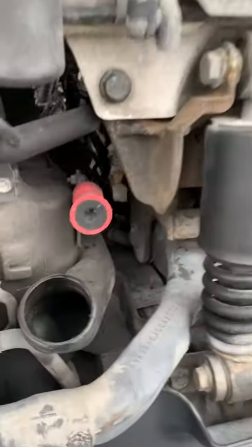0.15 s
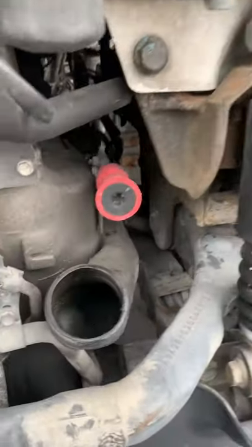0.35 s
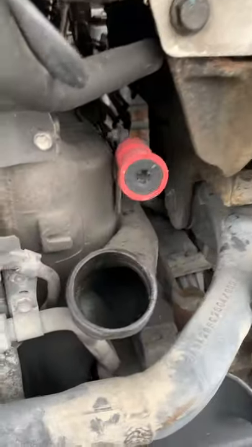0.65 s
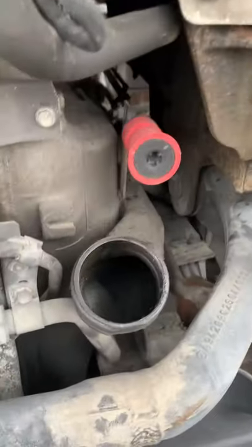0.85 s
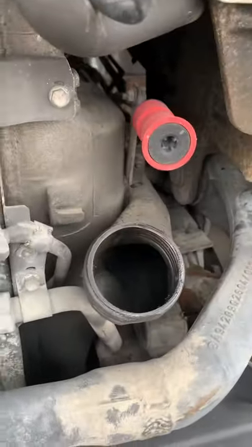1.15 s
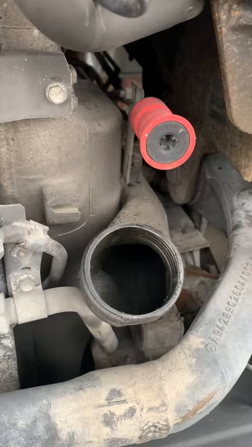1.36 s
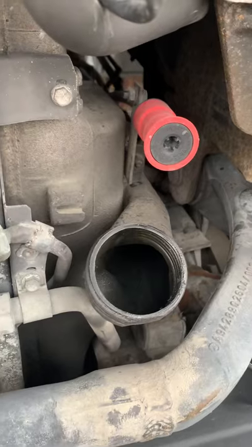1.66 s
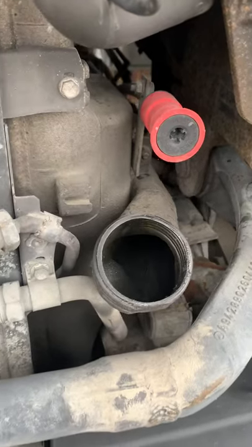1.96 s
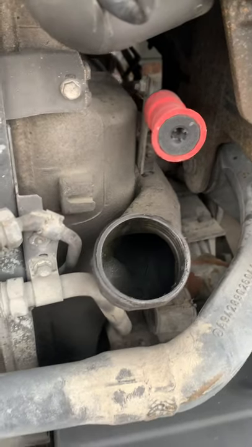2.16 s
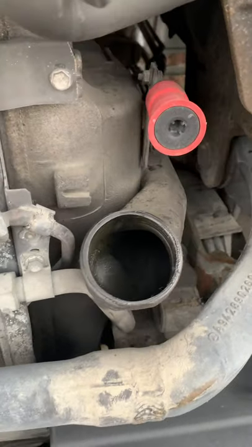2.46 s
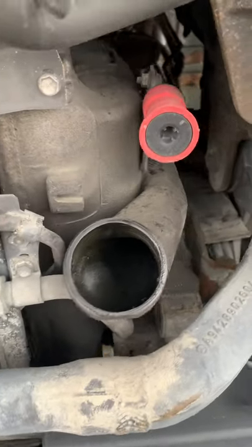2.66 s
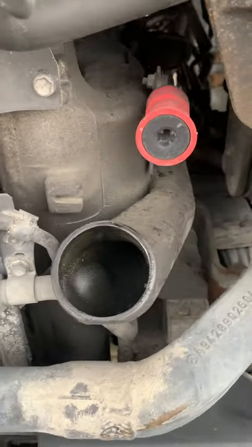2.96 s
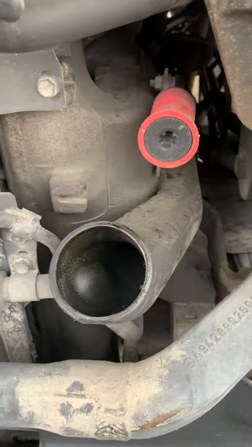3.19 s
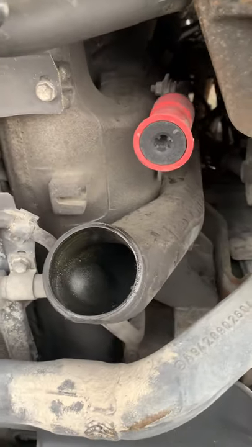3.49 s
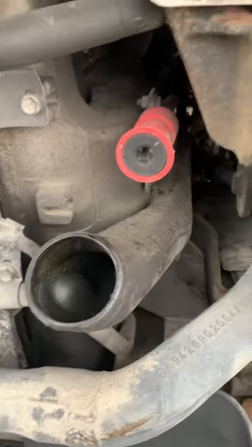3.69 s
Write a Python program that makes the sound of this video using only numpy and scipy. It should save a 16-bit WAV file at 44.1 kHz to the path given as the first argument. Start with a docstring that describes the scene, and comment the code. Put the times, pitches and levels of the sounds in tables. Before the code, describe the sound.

Truck diesel engine idling up close, rapid clattering knocks over a deep steady drone

```python
"""Beside the block of a six-cylinder truck diesel, close up, at idle.
Each firing thuds, clatters, ticks (shaped noise, largely cycle-locked) and rings a metal part (decaying modes).
The pattern repeats every six firings over a deep drone (crank-locked sines) and a fine noise hiss.
Air buffets the microphone (noise bursts), stray ticks land now and then, and twice the sound turns thin."""
import sys
import numpy as np
from scipy import signal
from scipy.fft import rfft, irfft
from scipy.io import wavfile
from scipy.ndimage import map_coordinates

SR = 44100
rng = np.random.default_rng(int(sys.argv[2]) if len(sys.argv) > 2 else 0)


def digitize_waveform(pressure):
    """Quantize a signal to 16-bit integers and store it at the path in sys.argv[1].

    Rows of a 2-D input are taken as channels; values are limited to [-1, 1].
    """
    field = np.atleast_2d(pressure).T
    bounded = np.clip(field, -1, 1)
    quanta = np.round(bounded * 32767).astype(np.int16)
    wavfile.write(sys.argv[1], SR, quanta)


N = 168903

# Cylinders in firing order: (thud [dB], clatter [dB], ring [dB], ring pitch [Hz], tick and hiss [dB])
CYLINDER_TABLE = [(-2.5, 2, -11, 1765, 4), (12.5, -2, -2, 1710, 0), (9, 0, -1, 1695, 3.5),
                  (-0.5, -1, -11, 1740, -2.5), (13.5, 0.5, -12, 1700, 3), (-14, 3.5, -4, 1770, 4)]
# Firing pulse harmonics: (multiple of firing rate [-], level [dB])
PULSE_HARMONICS = [(1, -46.5), (2, -34.5), (3, -25), (4, -36.5), (5, -51.5), (6, -43)]
# Drone, higher firing harmonics and lines between them: (multiple of six-firing cycle rate [-], level [dB])
CYCLE_HARMONICS = [(19, -38), (20, -36), (21, -33.5), (32, -42), (33, -46.5), (54, -46), (56, -46),
                   (60, -35.5), (61, -45), (72, -35)]
# Thump parts, once a cycle: (time after first firing [s], pitch [Hz], time from peak to 1/e [s], level [dB])
THUMP_PARTS = [(0.013, 254.4, 0.016, -22.5), (.021, 160, 0.0094, -17.5)]
# Modes of the struck part: (ratio to ring pitch [-], level [dB], t60 [s])
RING_MODES = [(0.966, -11, 0.069), (0.999, -1.5, 0.07), (1.038, -6, 0.062), (1.084, -10, 0.025),
              (1.16, -13, 0.036)]
# Noise colours: (frequency [Hz], relative density [dB per Hz])
THUD_COLOUR = [(20, -33), (45, -1), (70, -3.5), (92, -5.5), (120, 1.5), (160, -5), (200, -7), (255, 4),
               (295, 1), (340, -11), (390, -15), (600, -35), (2000, -80)]
CLATTER_COLOUR = [(100, -57), (300, -12), (385, -9), (435, 2.5), (520, 1.5), (590, 6), (660, 2.5),
                  (740, 4.5), (860, -1), (980, -5), (1220, -4), (1350, -7.5), (1500, -10), (1800, -9.5),
                  (2080, -13), (2250, -21), (2380, -16), (2650, -27.5), (4000, -66)]
TICK_COLOUR = [(800, -15), (2000, 3), (2700, -7.5), (3400, 6), (4500, -6), (5500, -5), (6100, -4.5),
               (6500, 3.5), (7100, -7.5), (7800, -13.5), (10000, -28), (13000, -57)]
HISS_COLOUR = [(100, -59), (7700, -52), (7900, -29), (8030, 2.5), (8250, -0.5), (8800, -8.5), (9500, -10.5),
               (10400, -16.5), (11000, -22.5), (11900, -25.5), (12600, -42)]
GUST_COLOUR = [(20, -43), (55, -15.5), (90, 0), (130, -6), (220, -20), (330, -22), (800, -17), (3000, -86)]
HOLLOW_COLOUR = [(200, -55), (360, -22), (400, -8), (422, 1.5), (442, -4), (485, -28), (900, -61)]  # air around the engine
# Left hiss, on top of its colour: (frequency [Hz], gain [dB])
HISS_LEFT_GAIN = [(8000, -18), (8250, -14), (9000, -23), (10300, -27), (12000, -26)]
# Air buffets: (time [s], time from peak to 1/e [s], level [dB])
BUFFET_EVENTS = [(0.205, 0.042, -27.5), (0.821, 0.025, -16.5), (1.378, 0.022, -19.5), (1.69, 0.019, -27.5),
                 (2.291, .035, -20.5), (3.21, 0.03, -18)]
# Stray sharper ticks: (time [s], relative level [dB])
STRAY_TICK_EVENTS = [(0.403, -27), (0.8591, -40), (0.932, -39), (1.0746, -35), (1.2891, -30), (2.1442, -34),
                     (2.216, -45), (3.3594, -31)]
# Clatter level: (time [s], gain [dB])
CLATTER_GAIN = [(0, -0.5), (.16, -2.5), (.25, 1), (.33, -2), (.6, -1.5), (1.25, 1), (1.37, 1), (1.5, .5),
                (2.4, 0), (3.2, 0), (3.83, 0.1)]
# Upper clatter level as the microphone moves in: (time [s], gain [dB])
UPPER_CLATTER_GAIN = [(0, 0), (.6, -1.5), (1.4, 0), (2.4, 0.5), (3.2, 1), (3.83, 2)]
# Thin stretches: (start [s], end [s])
THIN_STRETCHES = [(0.566, 1.325), (2.03, 2.255)]
# Colour of the thin stretches: (frequency [Hz], gain [dB])
THIN_COLOUR = [(30, -9), (85, -11.5), (200, -12), (285, -13.5), (335, -1.5), (385, 8), (425, 5.5),
               (480, -0.5), (600, -10.5), (750, -2), (1130, -1), (1250, -12.5), (1500, -1.5), (1700, -3),
               (1900, -2), (2200, -10.5), (2700, -16), (3400, -5.5), (6000, 4), (9000, 0)]
# Phase between the two microphones: (frequency [Hz], lead of left [rad])
LEFT_LEAD = [(20, 0), (1100, 0), (1400, 1.1), (1550, 1.1), (1700, -1.1), (2250, -1.5), (2600, -3.2),
             (3400, -4.3), (3700, -6.3), (4550, -6.2), (4750, -3.4), (5400, -2.7), (5900, -.1), (6500, .4),
             (7000, 2.9), (7550, 3.2), (8000, 5.4), (8700, 7)]
# Left-right likeness of the rattle: (frequency [Hz], shared part of power [-])
SHARED_POWER = [(20, 1), (300, 1), (650, 1), (900, 1), (1250, 0.59), (1560, 0.39), (1750, 0.85),
                (2250, 0.66), (2550, 0.46), (2900, 0.52), (3500, 0.93), (3900, 1), (4450, 0.71),
                (4650, 0.97), (5050, 1), (5700, 0.7), (6300, 0.71), (6850, 0.67), (7400, 0.89), (8200, 0.6),
                (9000, 0.64), (10000, .2)]

FIRING_HZ, FIRST_S, WANDER_S = 28.012, .002, 0.000292  # wander: rms timing drift
UNEVEN_DB = 1.8  # rms scatter of strength between firings
PULSE_DELAY_S, DRONE_WAVER_RMS = 0.01303, 0.28
RING_DB, RING_RISE_S, RING_UNEVEN_DB = -14.5, 0.0042, 0.6
RING_PEAK_S = .0045  # modes fall into step this long after the blow
RING_DETUNE_RMS, RING_SLIP_CYCLES, RING_SIDE_CYCLES = 0.01, 0.17, 0.039
AIR_DB, HOLLOW_DB, HOLLOW_FOLLOW_DB = -37.5, -42, -19.5
STRAY_TICK_DB, STRAY_TICK_FADE_S = -11, .004
UPPER_BAND_HZ = (755, 1300)
THIN_IN_S, THIN_OUT_S = 0.02, 0.0089
BASS_HZ, BASS_SAG_DB_PER_S = 276, 13
FADE_S, EDGE_HZ = .004, 12500

CYLINDER_COUNT = len(CYLINDER_TABLE)
THUD_DB, CLATTER_DB, _, _, TICK_DB = np.transpose(CYLINDER_TABLE)
TIME_S = np.arange(N) / SR


def amp(db):
    """Decibels to gain."""
    return 10 ** (np.asarray(db) / 20)


def unit(x):
    """Scales to rms 1."""
    return x / np.sqrt(np.mean(x ** 2) + 1e-20)


def read(points):
    """Reads a frequency table at every bin, linear in log frequency."""
    hz, value = np.transpose(points)
    bin_hz = np.fft.rfftfreq(N, 1 / SR)
    return np.interp(np.log(bin_hz + 1), np.log(hz + 1), value)


def colour(x, points):
    """Zero-phase filter from a table of (frequency [Hz], gain [dB])."""
    return irfft(rfft(x) * amp(read(points)), N)


def drift(hz):
    """Slow noise of rms 1, up to about hz."""
    lowpass = np.exp(-(np.fft.rfftfreq(N, 1 / SR) / hz) ** 2)
    return unit(irfft(rfft(rng.standard_normal(N)) * lowpass, N))


def firing_envelope(firings, levels_db, delay_s, rise_s, t60_s, floor_db):
    """Rises quickly at each firing, then decays exponentially toward a floor."""
    firings = firings - delay_s * FIRING_HZ
    k = np.floor(firings).astype(int)
    age_s = firings % 1 / FIRING_HZ
    cycles = 20  # enough to cover the duration
    scatter_db = UNEVEN_DB * rng.standard_normal(cycles * CYLINDER_COUNT)
    strength = amp(np.tile(levels_db, cycles) + scatter_db)
    now = strength[k] * np.minimum(age_s / rise_s, 1) * amp(-60 * age_s / t60_s)
    before = strength[k - 1] * amp(-60 * (age_s + 1 / FIRING_HZ) / t60_s)
    return np.sqrt(now ** 2 + before ** 2 + amp(floor_db) ** 2)


def rattle(firings, fresh):
    """Stereo noise that recurs every engine cycle, with a fresh share of power; sides differ by SHARED_POWER."""
    size = round(CYLINDER_COUNT * SR / FIRING_HZ)
    flat_spectra = np.exp(2j * np.pi * rng.random((3, size // 2 + 1)))
    patterns = unit(irfft(flat_spectra, size))
    position = firings / CYLINDER_COUNT % 1 * size
    repeated = np.array([map_coordinates(p, [position], mode="grid-wrap") for p in patterns])
    noise = rng.standard_normal((3, N))
    common, *sides = rfft(np.sqrt(1 - fresh) * repeated + np.sqrt(fresh) * noise)
    shared = read(SHARED_POWER)
    return irfft(np.sqrt(shared) * common + np.sqrt(1 - shared) * np.array(sides), N)


def air():
    """Moving air rumbles on the microphone, swells in buffets and holds a hollow note."""
    level = amp(AIR_DB)
    for at_s, half_s, db in BUFFET_EVENTS:
        level = level + amp(db) * np.exp(-((TIME_S - at_s) / half_s) ** 2)
    rumble = level * unit(colour(rng.standard_normal(N), GUST_COLOUR))
    hollow_level = amp(HOLLOW_DB) + amp(HOLLOW_FOLLOW_DB) * level
    return rumble + hollow_level * unit(colour(rng.standard_normal(N), HOLLOW_COLOUR))


def hiss(firings):
    """Non-repeating treble noise pulsed by the firings, mostly on the right."""
    envelope = firing_envelope(firings, TICK_DB, delay_s=0, rise_s=.002, t60_s=0.1, floor_db=-2.5)
    flicker = amp(0.94 * drift(83))
    left, right = colour(rattle(firings, fresh=1.0) * envelope * flicker, HISS_COLOUR)
    return amp(-46.0) * unit(np.array([colour(left, HISS_LEFT_GAIN), right]))


def drone(firings):
    """Crank-locked sines: a low pulse per firing, wavering cycle harmonics and a thump per cycle."""
    pulse_at = firings - PULSE_DELAY_S * FIRING_HZ
    pulse = sum(amp(db) * np.cos(2 * np.pi * k * pulse_at) for k, db in PULSE_HARMONICS)
    hum = 0
    for k, db in CYCLE_HARMONICS:
        waver = 1 + DRONE_WAVER_RMS * drift(11.7)
        hum = hum + amp(db) * waver * np.sin(2 * np.pi * (k / CYLINDER_COUNT * firings + rng.random()))
    out = np.sqrt(2) * (pulse * (1 + DRONE_WAVER_RMS * drift(6.7)) + hum)
    half_cycle = CYLINDER_COUNT / 2
    for at_s, hz, half_s, db in THUMP_PARTS:
        # time from the nearest thump, negative before it
        offset = (firings - at_s * FIRING_HZ + half_cycle) % CYLINDER_COUNT - half_cycle
        age_s = offset / FIRING_HZ
        tone = np.sin(2 * np.pi * (hz * age_s + rng.random()))
        out = out + amp(db) * np.exp(-(age_s / half_s) ** 2) * tone
    return out


def stray_ticks():
    """A few sharper metallic ticks: treble noise that starts abruptly at each tick and decays quickly."""
    level = sum(amp(db) * (TIME_S >= at_s) * np.exp(-abs(TIME_S - at_s) / STRAY_TICK_FADE_S)
                for at_s, db in STRAY_TICK_EVENTS)
    return amp(STRAY_TICK_DB) * level * unit(colour(rng.standard_normal((2, N)), TICK_COLOUR))


def firing_tick(firings):
    """Bright, half-repeating noise at each firing."""
    envelope = firing_envelope(firings, TICK_DB, delay_s=0, rise_s=0.0023, t60_s=0.15, floor_db=-6.5)
    flicker = amp(1.0 * drift(67))
    return amp(-51.5) * unit(colour(rattle(firings, fresh=0.54) * envelope * flicker, TICK_COLOUR))


def ring(firings):
    """Each firing strikes a metal part whose close modes ring briefly."""
    out = np.zeros((2, N + SR))
    t = np.arange(SR // 12) / SR
    rise = np.minimum(t / RING_RISE_S, 1)
    starts = np.searchsorted(firings, np.arange(int(firings[-1]) + 1))
    for k, at in enumerate(starts):
        _, _, db, hz, _ = CYLINDER_TABLE[k % CYLINDER_COUNT]
        for ratio, mode_db, t60_s in RING_MODES:
            detune, force, side, slip = rng.standard_normal(4)
            mode_hz = hz * ratio * (1 + RING_DETUNE_RMS * detune)
            side_cycles = RING_SIDE_CYCLES * side * np.array([[1], [-1]])
            cycles = mode_hz * (t - RING_PEAK_S) + RING_SLIP_CYCLES * slip + side_cycles
            level = amp(db + mode_db + RING_UNEVEN_DB * force)
            out[:, at:at + len(t)] += level * rise * amp(-60 * t / t60_s) * np.sin(2 * np.pi * cycles)
    balance_db = np.array([[.5], [-.6]])
    return amp(RING_DB + balance_db) * out[:, :N]


def approach(x):
    """The clatter swells and sinks; its upper band changes level as the microphone moves in."""
    near = amp(np.interp(TIME_S, *np.transpose(CLATTER_GAIN)))
    upper = amp(np.interp(TIME_S, *np.transpose(UPPER_CLATTER_GAIN)))
    bandpass = signal.butter(2, UPPER_BAND_HZ, "bandpass", fs=SR, output="sos")
    return near * (x + (upper - 1) * signal.sosfiltfilt(bandpass, x))


def clatter(firings):
    """Combustion shakes the block: hard, mostly repeating midrange noise."""
    envelope = firing_envelope(firings, CLATTER_DB, delay_s=.002, rise_s=.004, t60_s=0.12, floor_db=-13.5)
    return amp(-27.5) * approach(unit(colour(rattle(firings, fresh=0.13) * envelope, CLATTER_COLOUR)))


def thud(firings):
    """Combustion shakes the block: low, nearly repeating noise, equal on both sides."""
    envelope = firing_envelope(firings, THUD_DB, delay_s=0.0082, rise_s=0.0033, t60_s=0.047, floor_db=0)
    return amp(-28.5) * unit(colour(rattle(firings, fresh=0.027)[0] * envelope, THUD_COLOUR))


def scene():
    """One crankshaft, counted in firings, drives all layers but the air and stray ticks."""
    firings = (TIME_S - FIRST_S + WANDER_S * drift(1.9)) * FIRING_HZ
    background = air() + hiss(firings) + drone(firings) + stray_ticks()
    return background + firing_tick(firings) + ring(firings) + clatter(firings) + thud(firings)


def record(dry):
    """End fades, thin stretches with sinking bass, microphone phase and band limit."""
    edge_s = np.minimum(TIME_S, TIME_S[::-1])
    dry = dry * np.sin(np.pi / 2 * np.minimum(edge_s / FADE_S, 1)) ** 2
    thin, held_s = 0, 0
    for start_s, end_s in THIN_STRETCHES:
        ramp = np.minimum((TIME_S - start_s) / THIN_IN_S, (end_s - TIME_S) / THIN_OUT_S)
        thin = thin + np.clip(ramp + .5, 0, 1)
        inside = (TIME_S > start_s) * (TIME_S < end_s + THIN_OUT_S)
        held_s = held_s + (TIME_S - start_s) * inside
    thinned = colour(dry, THIN_COLOUR)
    bass = signal.sosfiltfilt(signal.butter(2, BASS_HZ, fs=SR, output="sos"), thinned)
    sagged = thinned - bass * (1 - amp(-BASS_SAG_DB_PER_S * held_s))
    left, right = (1 - thin) * dry + thin * sagged
    left = irfft(rfft(left) * np.exp(1j * read(LEFT_LEAD)), N)
    lowpass = signal.firwin(255, EDGE_HZ, window=("kaiser", 8), fs=SR)
    return signal.oaconvolve(np.array([left, right]), lowpass[None], "same")


dry = scene()
out = record(dry)
digitize_waveform(out)
```